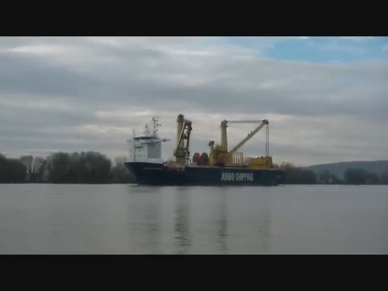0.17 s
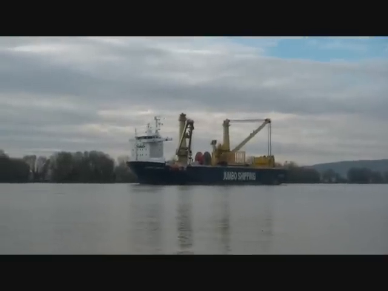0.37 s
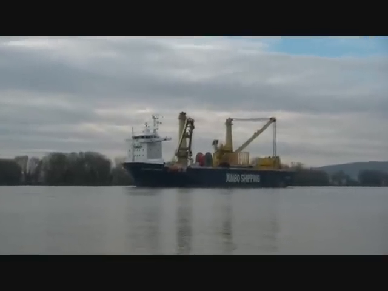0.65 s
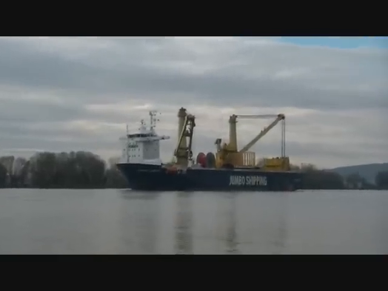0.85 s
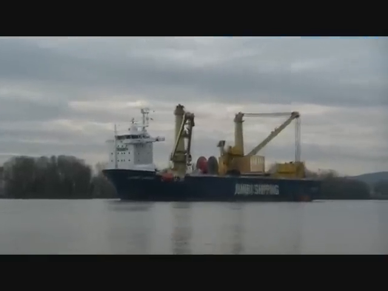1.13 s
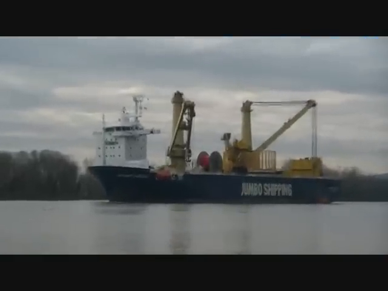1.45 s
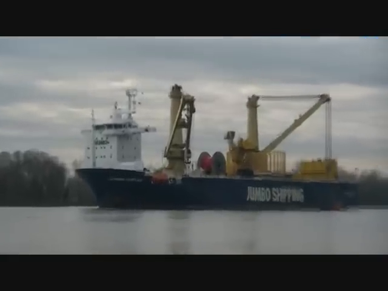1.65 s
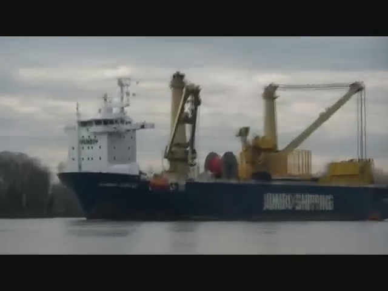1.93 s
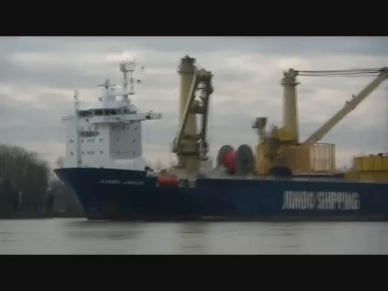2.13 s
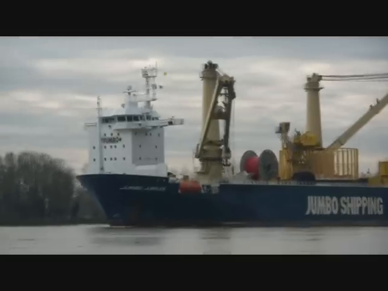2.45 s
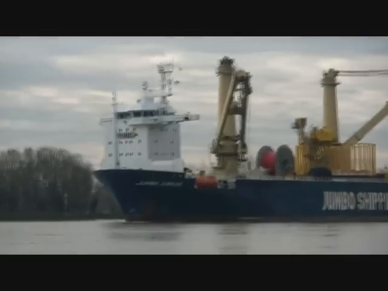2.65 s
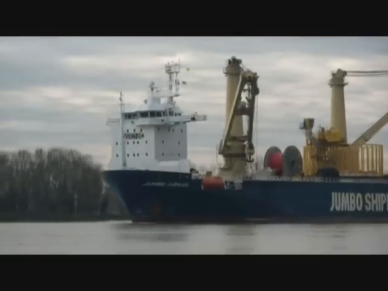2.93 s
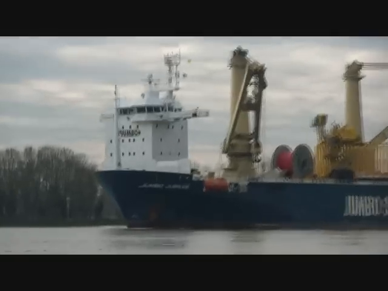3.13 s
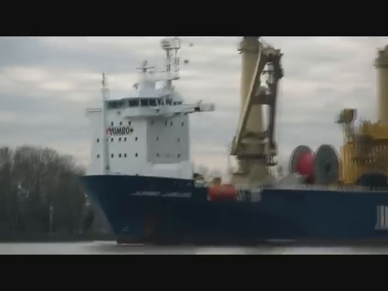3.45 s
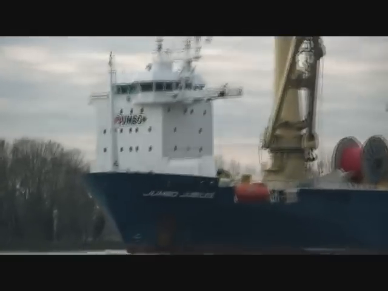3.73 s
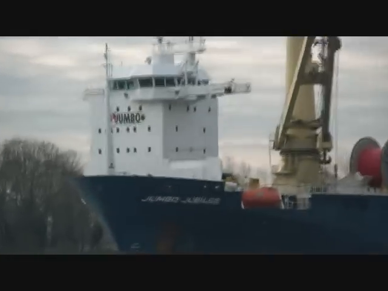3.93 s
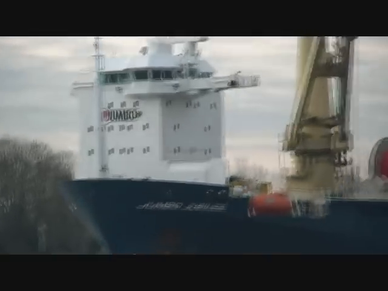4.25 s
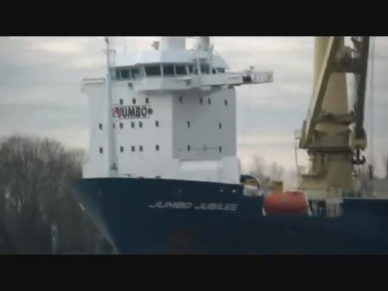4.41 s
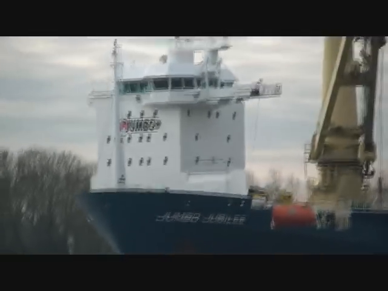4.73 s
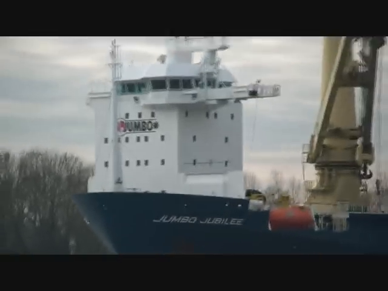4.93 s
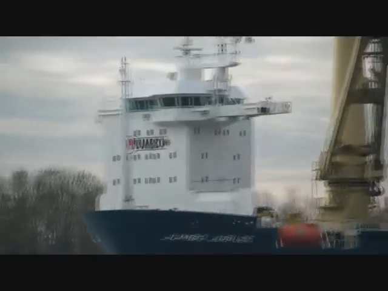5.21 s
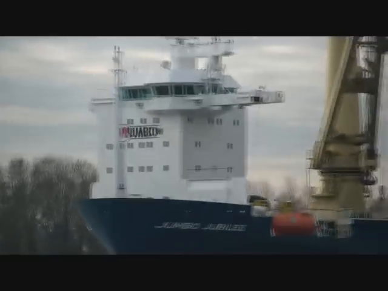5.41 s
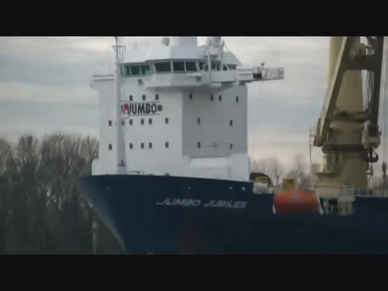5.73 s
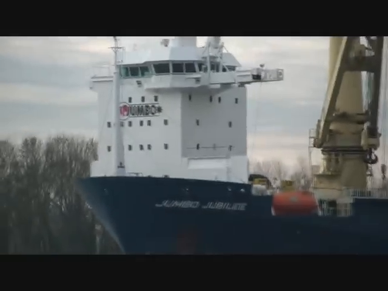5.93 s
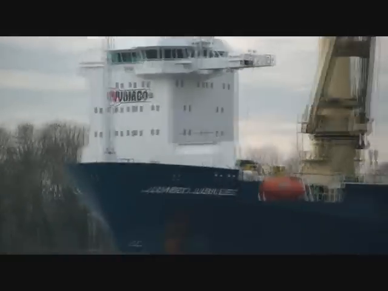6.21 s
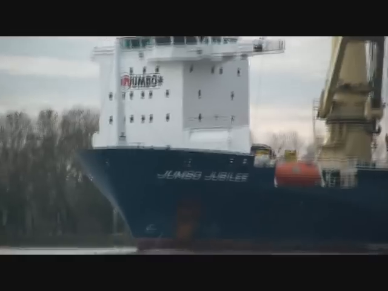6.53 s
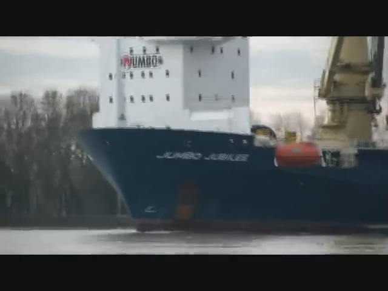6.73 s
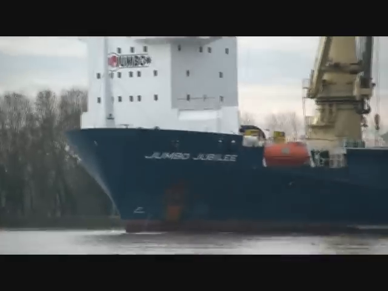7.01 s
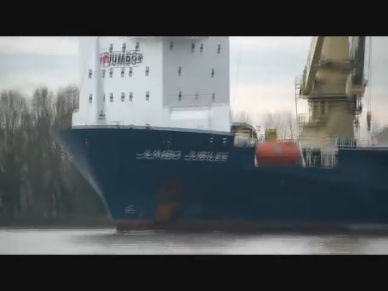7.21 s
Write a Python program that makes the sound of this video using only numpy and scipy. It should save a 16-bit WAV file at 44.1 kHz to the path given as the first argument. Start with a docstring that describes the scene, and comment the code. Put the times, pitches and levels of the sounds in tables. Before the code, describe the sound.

A heavy ship's deep engine rumble and wavering hum cross the water, with wind thumping the microphone and tiny camera focus ticks close by.

```python
"""A heavy cargo ship glides up a river, heard from the bank: filtered noise makes its rumble, drone, roar and air,
wavering tones its hum and blowers, which stand out in swells. Breeze noise, a steady hiss and a camera's whine join in.
Soon focus ticks begin, each a rattle in the lens barrel; a gust and one eddy thump the right microphone port.
The shell creaks; midway a bright wash peaks, the lens motor whirrs, and gusts and eddies pound the left port.
After more creaks and a last gust, the blowers swell again while the ticks go on."""
import sys
import numpy as np
from scipy import signal
from scipy.io import wavfile
from scipy.ndimage import uniform_filter1d

SR = 44100
rng = np.random.default_rng(int(sys.argv[2]) if len(sys.argv) > 2 else 0)


def unload_wav(signal):
    """Save mono or channel-first audio to the path in sys.argv[1] as 16-bit WAV at rate SR, clipped to [-1, 1]."""
    wavfile.write(
        sys.argv[1],
        SR,
        np.round(np.clip(np.atleast_2d(signal).T, -1, 1) * 32767).astype(np.int16),
    )


N = 324576
TIME = np.arange(N) / SR
FIELD_HZ = 50  # the camera's picture clock, two fields to a frame


def from_db(db):
    """Decibels to gain."""
    return 10 ** (np.asarray(db) / 20)


def rms_one(x):
    """Scale to unit power."""
    return x / np.sqrt(np.mean(x ** 2) + 1e-20)


def in_time(rows):
    """Draw each column of a level curve at every sample, straight from point to point."""
    seconds, *columns = np.transpose(rows)
    return [np.interp(TIME, seconds, column) for column in columns]


def at_hz(points, hz):
    """Read a table on a log-frequency axis."""
    table_hz, values = np.array(points).T
    return np.interp(np.log(hz), np.log(table_hz), values)


def bump(s, half):
    """A smooth rise and fall of height 1 around a moment; it is down to 1/e at the half length."""
    return np.exp(-((TIME - s) / half) ** 2)


def bumps(rows):
    """Rows of moment, half length and heights as one smooth curve for each column of heights."""
    return sum(np.outer(heights, bump(s, half)) for s, half, *heights in rows)


def drift(rate):
    """Slow chance with spread 1: white noise through two equal low-pass poles at the rate in Hz."""
    step = 40  # samples between drawn points
    pole = np.exp(-2 * np.pi * rate * step / SR)
    white = rng.standard_normal(N // step + 2002)
    # the first points only settle the filter
    slow = signal.lfilter([1], [1, -2 * pole, pole * pole], white)[2000:]
    return np.interp(np.arange(N) / step, np.arange(len(slow)), rms_one(slow))


def bandpass(x, low, high):
    """Second-order band-pass between two frequencies in Hz."""
    return signal.sosfilt(signal.butter(2, [low, high], "band", fs=SR, output="sos"), x)


def banded_noise(spectrum, patchy_db, shared=True):
    """Stereo noise in bands that flutter separately; unshared noise is each port's own."""
    # Each row: frequency in Hz, left-right likeness (1 is the same at both ports).
    likeness = [(20, 0.93), (60, 1), (130, 1), (300, 0.88), (630, 0.76), (880, 0.37), (1150, 0.42),
                (1550, 0.31), (2100, 0.38), (2900, 0.016), (4500, 0.016), (10000, 0.0096), (13500, 1)]
    # Upper sound reaches the left port first. Each row: frequency in Hz, lead in s.
    lead = [(1000, 0), (1400, .00011), (2000, .00021), (3500, .00025), (5500, 0)]
    edges = 8 * 2 ** (np.arange(29) * .4)
    white = rng.standard_normal((2, 2, N + SR // 2))
    out = 0
    for k, (low, high) in enumerate(zip(edges, edges[1:])):
        hz = np.sqrt(low * high)
        if not spectrum[0][0] <= hz <= spectrum[-1][0]:
            continue
        # neighbouring bands take different noise; the filter's first half second is dropped
        mid, side = bandpass(white[k % 2], low, high)[:, -N:]
        alike = np.clip(at_hz(likeness, hz), -1, 1) * shared
        gain = from_db(at_hz(spectrum, hz) + patchy_db * drift(11.3))
        left, right = np.sqrt(1 + alike) * mid + np.sqrt(1 - alike) * side * [[1], [-1]]
        late_right = np.roll(right, round(at_hz(lead, hz) * SR))
        out = out + gain * np.array([left, late_right])
    return rms_one(out)


def tone(hz, scatter, fade_rate, apart):
    """A steady tone plus scattered copies of drifting phase, partly different at each port."""
    def paths():
        return (drift(fade_rate) + 1j * drift(fade_rate)) / np.sqrt(2)
    arrival = 1 + scatter * paths() + apart * np.array([paths(), paths()])
    carrier = np.exp(2j * np.pi * (hz * TIME + rng.random()))
    return rms_one(np.real(arrival * carrier))


def sine(hz, db):
    """A plain sine at an rms level in dB."""
    return np.sqrt(2) * from_db(db) * np.sin(2 * np.pi * hz * TIME)


def ring(clicks, hz, t60):
    """A damped resonance: a unit click sets a decaying sine ringing, 60 dB down after t60 seconds."""
    r, w = from_db(-60 / (t60 * SR)), 2 * np.pi * hz / SR
    return signal.lfilter([0, np.sin(w)], [1, -2 * r * np.cos(w), r * r], clicks + 1e-18)


def ship_noise(lift_db):
    """Exhaust rumble, hull drone and ventilation roar surge and sag; swells shift the rushing air."""
    # Noise colours. Each row: frequency in Hz, relative level in dB per Hz.
    rumble_colour, drone_colour = [(12, -31), (25, -9), (36, 1.5), (50, 2.5), (72, -2), (100, -3),
                                   (135, -15.5), (190, -22), (300, -41)], [(105, -34), (185, 0.5), (260, -2.5), (350, -5.5),
                                                   (520, -28)]
    roar_colour, air_colour = [(270, -15), (420, 2.5), (500, -1), (620, -2), (800, -8), (1150, -9)], [(520, -17), (850, 2.5), (1000, -2.5), (1200, 0.3), (1450, -5),
                                             (1850, -7), (2300, -13), (3000, -19), (4500, -30), (8000, -28)]
    # Base levels of the mids. Each row: time in s, hull drone in dB, ventilation roar in dB.
    mids = [(0, -34.5, -37.5), (1.3, -34.5, -36.5), (2.0, -34.5, -37.5), (3.0, -32.5, -35.5),
            (3.9, -34.5, -38), (5.4, -32, -37.5), (6.6, -31, -40), (7.36, -30.5, -35.5)]
    # Surges and sags. Each row: moment in s, half length in s, rumble change in dB, drone and roar change in dB.
    surges = [(0.79, 0.066, 0.5, 1.5), (1.23, 0.047, -2.5, 4.2), (1.79, .04, 4.5, 1.5), (2.33, .05, 1, -1),
              (2.78, 0.035, 3, -1), (2.93, 0.033, -2, 2), (3.29, 0.075, 6, -1), (3.5, 0.23, -5, 0),
              (3.72, 0.05, 8, -0.5), (4.95, 0.033, 4, 1), (5.2, 0.064, 3, -1), (5.45, 0.042, -5, 1.5),
              (5.59, 0.018, 6.5, 2), (5.97, 0.068, 1, 0.5), (6.21, 0.035, -8, -1), (6.98, 0.068, 3, -1),
              (7.17, 0.11, -3.5, -1)]
    rumble_db, air_db = -21.5, -41  # base levels, dB rms
    throb_db, growl_db = bumps(surges)
    drone_db, roar_db = in_time(mids) + growl_db
    rumble = from_db(rumble_db + throb_db) * banded_noise(rumble_colour, patchy_db=0.3)
    drone = from_db(drone_db - 1.0) * banded_noise(drone_colour, patchy_db=0.77)
    roar = from_db(roar_db + 0.1) * banded_noise(roar_colour, patchy_db=1.1)
    air = from_db(air_db + lift_db) * banded_noise(air_colour, patchy_db=1.0)
    return rumble + drone + roar + air


def ship_tones(carry):
    """Engine and shaft hum, and blower tones that stand out in each swell; wandering paths make them waver."""
    # Engine and shaft hum. Each row: frequency in Hz, level in dB rms.
    hum_tones = [(15, -32), (50, -30.5), (72.5, -35), (143.5, -37), (172, -43.5), (181.5, -49), (212, -54),
                 (351, -50.5), (426, -52.5), (473, -58), (518, -47)]
    # Each row: blower frequency in Hz, swell it follows (low 0, middle 1, high 2), strength of the scattered paths.
    blower_tones = [(719, 0, .55), (1082.5, 1, .8), (1494, 2, .4), (1945, 2, .5)]
    # The same tones between swells. Each row: level at the start in dB rms, change in dB per s.
    blower_levels = [(-57.5, 0.45), (-67.5, 0.75), (-65.5, -0.1), (-83, 0)]
    swell_db = 15.5  # lift at swell strength 1
    fade_db, fades_hz = 1.3, 8  # each blower tone also wavers on its own
    out = sum(from_db(db) * tone(hz, scatter=0.66, fade_rate=4.15, apart=0.26) for hz, db in hum_tones)
    for (hz, k, scatter), (start_db, db_per_s) in zip(blower_tones, blower_levels):
        level_db = start_db + db_per_s * TIME + swell_db * carry[k] + fade_db * drift(fades_hz)
        out = out + from_db(level_db) * tone(hz, scatter=scatter, fade_rate=8.6, apart=0.34)
    return out


def bright_wash():
    """A faint bright wash of noise rises and falls once."""
    # Each row: frequency in Hz, relative level in dB per Hz.
    colour = [(1700, 3), (2800, -3.5), (5000, -12)]
    peak_db, peak_s, half_s = -51.5, 4.06, 2  # dB rms, s, s
    return from_db(peak_db) * bump(peak_s, half_s) * banded_noise(colour, patchy_db=2.0)


def wind():
    """An uneven breeze and a few gusts raise lumpy turbulence at each port."""
    # Each row: frequency in Hz, relative level in dB per Hz.
    colour = [(8, 1.5), (15, -4), (30, -1.5), (55, -5.5), (100, -21), (180, -54), (400, -58)]
    # Strong gusts. Each row: moment in s, half length in s, left level in dB, right level in dB.
    gusts = [(1.5, 0.4, -28, -21.5), (3.24, 0.092, -18.5, -30), (4.316, 0.069, -14, -25),
             (4.528, 0.031, -9.5, -27), (4.724, 0.19, -17, -26), (4.95, 0.078, -19, -18.5),
             (6.21, 0.1, -26, -19.5)]
    breeze_db, swing_db, swings_hz = -36, 5, 2.4
    power = from_db(breeze_db + swing_db * drift(swings_hz)) ** 2
    for s, half, left_db, right_db in gusts:
        power = power + from_db([[left_db], [right_db]]) ** 2 * bump(s, half)
    return np.sqrt(power) * banded_noise(colour, patchy_db=1.0, shared=False)


def whine():
    """Oscillators whine; the top one dips once a field and restarts once a frame, with a buzzing edge."""
    # Each row: frequency in Hz, level in dB rms; the last is the top tone before its slip and dips.
    whines = [(9351, -74.5), (9400, -79), (13025.3, -48)]
    *faint, (top_hz, top_db) = whines
    first_dip_s, dip_half_s, dip_depth = .0231, 0.0013, 0.32
    slip_hz = 5  # how far the top tone runs flat between restarts
    edge_hz, edge_db = 130, -48  # the flatter tone during a dip: Hz below the top tone, peak dB
    field_s = 1 / FIELD_HZ
    since = (TIME - first_dip_s + field_s / 2) % field_s - field_s / 2
    dip = np.exp(-(since / dip_half_s) ** 2)
    # it falls slowly behind through each frame of two fields, then snaps back into step
    turns = top_hz * TIME - slip_hz * ((TIME - first_dip_s) % (2 * field_s))
    top = np.sqrt(2) * from_db(top_db) * (1 - dip_depth * dip) * np.sin(2 * np.pi * turns)
    edge = from_db(edge_db) * dip * np.sin(2 * np.pi * (turns - edge_hz * since))
    fuzz = from_db(-61.0) * rms_one(bandpass(rng.standard_normal(N), 12650, 13500))
    return sum(sine(hz, db) for hz, db in faint) + top - edge + fuzz


def hiss():
    """A steady bed of bright noise."""
    # Each row: frequency in Hz, relative level in dB per Hz.
    colour = [(1500, 4), (3500, 5.5), (5500, 4.5), (7500, 0.5), (11500, 5), (13500, -7), (15000, -14)]
    return from_db(-53.5) * banded_noise(colour, patchy_db=1.0)


def lens_ticks():
    """The lens motor steps small once a field and larger in focus moves; each step rattles the barrel."""
    # Barrel resonances. Each row: frequency in Hz, relative level in dB, 60 dB decay in s.
    barrel = [(3380, -5, 0.0051), (4530, -7, 0.0077), (5580, -4.5, 0.012), (5770, -7.5, 0.022),
              (6310, -1.5, 0.01)]
    # Runs of evenly spaced ticks. Each row: start in s, number of ticks, peak in dB before the tick lift.
    focus_moves = [(0.7245, 1, -38), (2.7841, 3, -45), (2.824, 2, -43), (3.0642, 1, -39), (3.184, 1, -47),
                   (4.8445, 1, -41), (5.0043, 1, -37), (5.165, 1, -41), (5.323, 1, -44), (5.4839, 3, -40),
                   (5.904, 1, -46), (6.2034, 1, -43), (6.384, 1, -44), (6.4446, 6, -46), (6.685, 1, -43),
                   (7.003, 1, -48), (7.0435, 3, -44), (7.0843, 1, -40)]
    focus_step_s, rattle_s, tick_lift_db = .12, .0028, 4.0  # tick spacing, decay of one step, lift of all ticks
    large = [(s + k * focus_step_s, db) for s, count, db in focus_moves for k in range(round(count))]
    # small steps start with the first focus move and grow slowly, with a chance spread of 2.9 dB
    fields = np.arange(focus_moves[0][0], TIME[-1], 1 / FIELD_HZ)
    small_db = -52.5 + 0.69 * fields + 2.9 * rng.standard_normal(len(fields))
    steps = np.vstack([large, np.column_stack([fields, small_db])])
    age = TIME[:SR // FIELD_HZ]
    rattle = np.exp(-age / rattle_s) * rng.standard_normal((len(steps), 2, len(age)))
    clicks = sum(from_db(db) * ring(rattle, hz, t60) for hz, db, t60 in barrel)
    ticks = np.zeros((2, N + len(age)))
    for (s, db), click in zip(steps, clicks):
        at = min(round(s * SR), N)
        ticks[:, at:at + len(age)] += from_db(db + tick_lift_db) * click / np.abs(click).max()
    return ticks[:, :N]


def eddies():
    """Each eddy thumps one port: a suction between two pushes."""
    # Each row: moment in s, half length in s, depth of the suction in dB, left port 0 or right port 1.
    thumps = [(1.776, 0.0055, 2, 1), (4.219, 0.0065, -6, 0), (4.284, 0.0063, -1.5, 0),
              (4.358, 0.0069, 0.5, 0), (4.473, 0.0069, -3.5, 0), (4.493, 0.0049, -5.5, 0),
              (4.616, 0.0073, -5, 0), (4.681, 0.011, -7, 0)]
    rebound = .8  # tilt that makes the push after the suction stronger than the one before
    out = np.zeros((2, N))
    for s, half, db, port in thumps:
        u = (TIME - s) / half
        out[int(port > .5)] += from_db(db) * (2 * u ** 2 + rebound * u - 1) * bump(s, half)
    return out


def creaks():
    """Each slip of the plastic shell in the hand is a noise burst through a bright snap and one resonance."""
    # Each row: moment in s, body peak in dB before the 7.5 dB lift, resonance in Hz, decay of the slip in s.
    slips = [(2.327, -43, 3300, 0.003), (2.328, -41, 2100, .002), (2.391, -42.5, 4800, .002),
             (4.5703, -43, 4300, .0012), (4.573, -46, 3900, .001), (4.8263, -37, 3300, 0.002),
             (4.827, -35, 1900, .0015)]
    out = 0
    for s, db, hz, decay in slips:
        fade = np.exp(-np.clip((TIME - s) / decay, 0, 40))
        slip = (TIME >= s) * fade * rng.standard_normal((2, N))
        body = ring(slip, hz, t60=0.004)
        snap = ring(slip, 5800, t60=0.00072)
        # the snap peaks 13 dB under the body
        creak = body / np.abs(body).max() + from_db(-13) * snap / np.abs(snap).max()
        out = out + from_db(db + 7.5) * creak
    return out


def lens_whirr():
    """The lens motor whirrs: nearly steady tones that fade in and out softly."""
    # Each row: start in s, end in s, frequency in Hz, level in dB rms, left-right difference against the common part.
    whirrs = [(4.01, 4.29, 5600, -67, .3), (4.19, 4.48, 4790, -66, .3)]
    out = 0
    for start, end, hz, db, apart in whirrs:
        running = 1. * ((TIME > start) & (TIME < end))
        soft = uniform_filter1d(running, size=600)
        out = out + from_db(db) * soft * tone(hz, scatter=0.15, fade_rate=10, apart=apart)
    return out


def scene():
    """The ship lies a little to the left; wind and camera sounds are at the microphone."""
    # Swells, when the breeze carries the ship's sound better across the water. Each row: moment in s,
    # half length in s, strength for the low, middle and high blower tones, change of the rushing air in dB.
    swells = [(0.7, 0.13, 0.17, .8, 0.69, .2), (0.88, 0.14, 1.17, .55, 1, .2),
              (1.04, .08, 0.3, .85, 0.021, 0), (1.25, 0.08, 0.7, 0, 0.86, 0),
              (2.98, 0.22, 0.42, 0.74, 0.4, 1.3), (3.84, 0.076, 0.7, 0, 0.49, 0.5),
              (4.02, .07, 0.15, .3, 0.77, 0), (5.82, 0.098, 0.62, .95, 0.9, 0),
              (6.03, 0.17, 0, 0.85, 0.6, 1.3), (6.27, 0.2, .34, 0.66, .62, 0),
              (6.48, 0.11, 0.15, 0.62, 0, -1), (7.156, 0.13, 0.35, 0.41, 0.54, -0.5)]
    *carry, lift_db = bumps(swells)
    ship = ship_noise(lift_db) + ship_tones(carry) + bright_wash()
    ship = ship * from_db([[.55], [-.55]])
    camera = whine() + lens_ticks() + creaks() + lens_whirr()
    return ship + wind() + hiss() + eddies() + camera


def record(dry):
    """Peaks beyond full scale are clipped flat; then a steep low-pass cuts the top."""
    low_pass = signal.ellip(10, .1, 80, 14700, fs=SR, output="sos")
    return signal.sosfilt(low_pass, np.clip(dry, -1, 1))


dry = scene()
out = record(dry)
unload_wav(out)
```